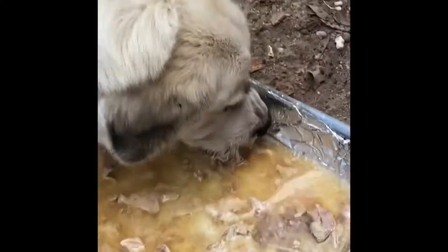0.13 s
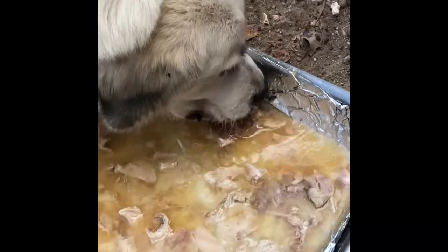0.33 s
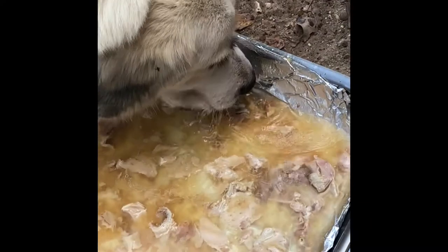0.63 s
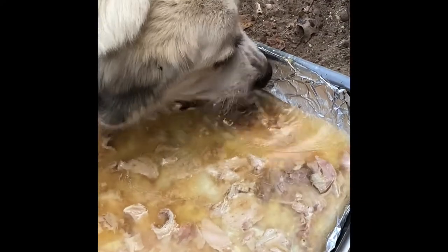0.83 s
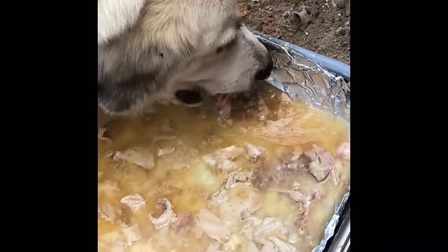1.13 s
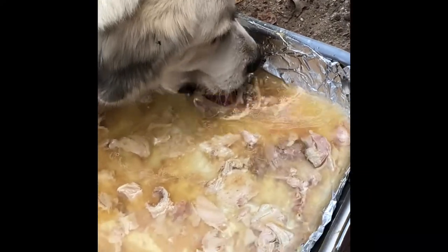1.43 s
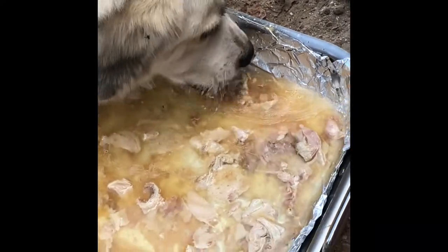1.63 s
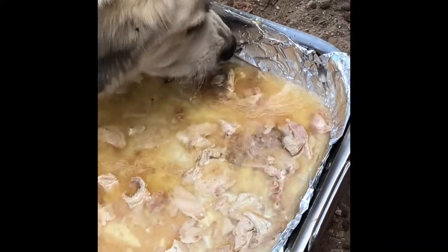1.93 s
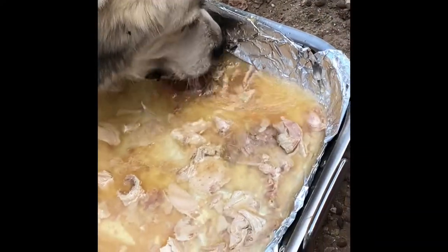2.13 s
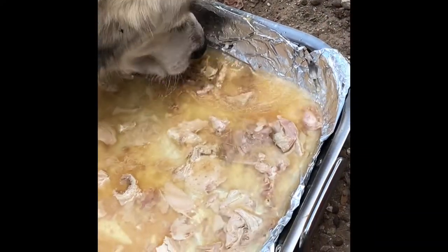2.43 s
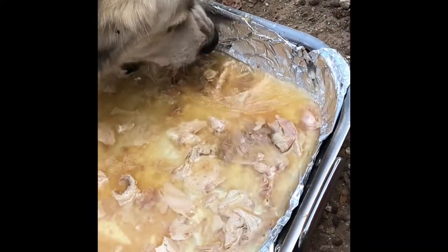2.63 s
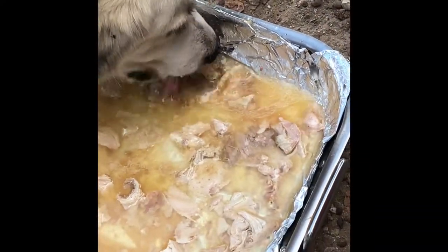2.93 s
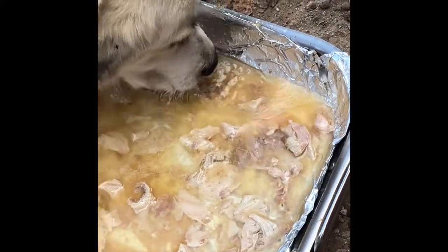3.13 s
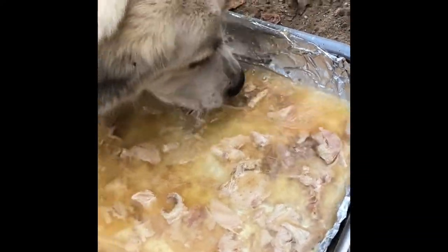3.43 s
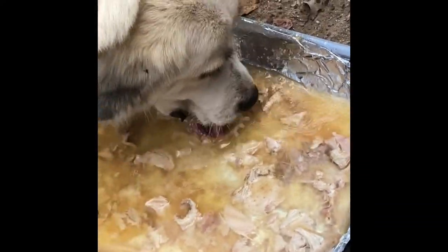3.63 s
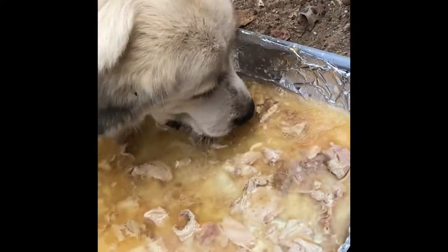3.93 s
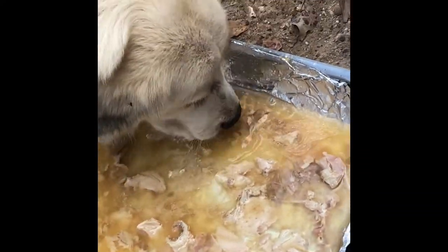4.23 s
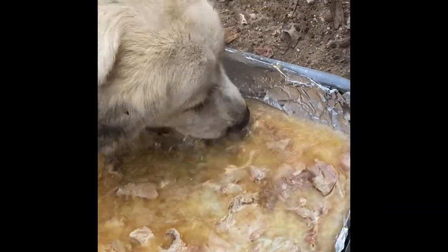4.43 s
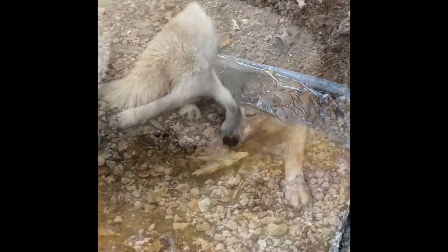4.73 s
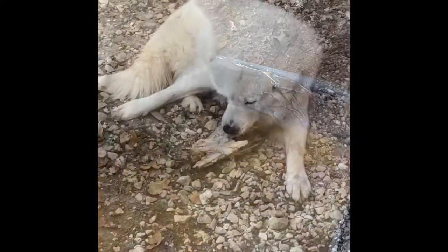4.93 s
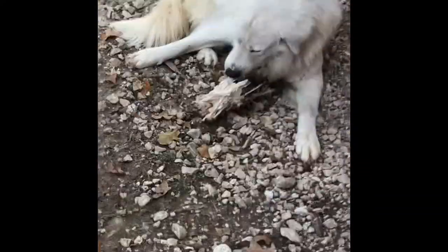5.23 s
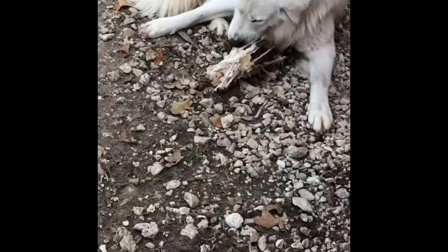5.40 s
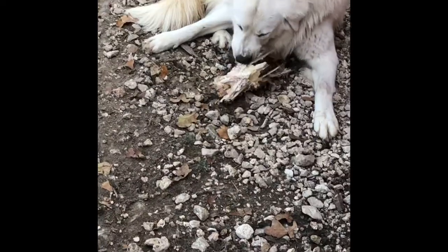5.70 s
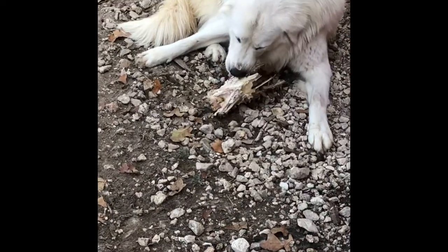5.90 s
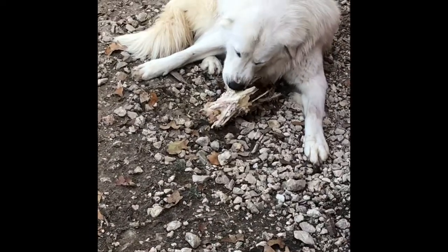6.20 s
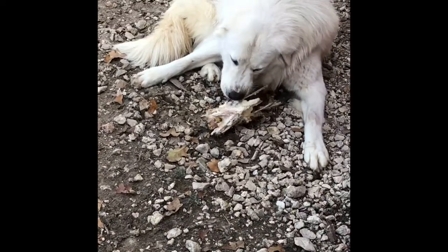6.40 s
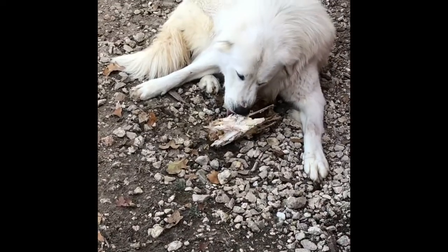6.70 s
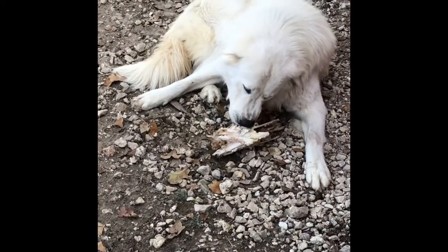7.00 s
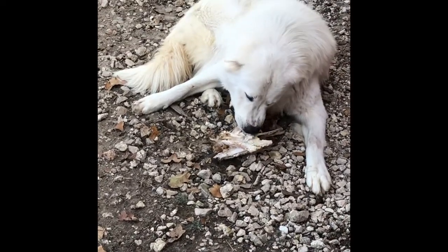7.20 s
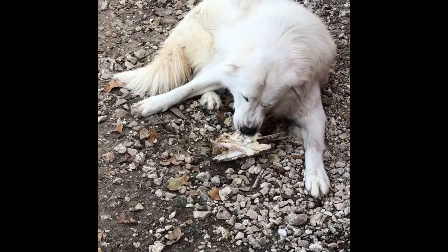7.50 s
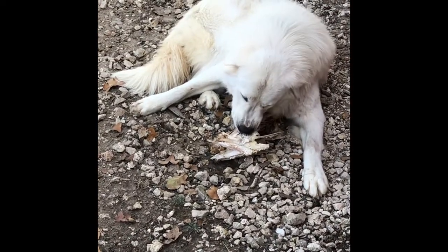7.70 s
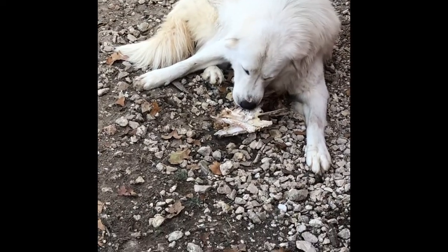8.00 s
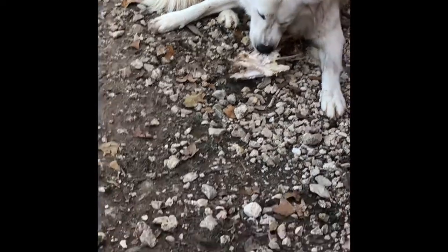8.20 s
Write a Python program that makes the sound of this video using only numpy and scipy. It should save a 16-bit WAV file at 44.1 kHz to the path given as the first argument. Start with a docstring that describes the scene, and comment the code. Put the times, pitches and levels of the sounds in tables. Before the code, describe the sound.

Very close outdoor pickup of a large dog lapping broth from a metal tray, nearly three strokes a second. Each stroke plops, sloshes and smacks, with pinging droplets and dull gulps. A collar tag tinkles now and then. After the middle the lapping grows softer, soft grunts and nose snuffles join in, and a fowl rasps three times quickly. Faint traffic rumbles far away.

```python
"""A dog laps broth outdoors, nearly three strokes a second: air pockets plop as chirping bubbles over crackling slaps,
droplets ping as tiny bubbles, the wet tongue smacks in bursts of crackle, the broth sloshes as countless bubbles,
gulps thump and air slurps upward in pitch. A collar tag tinkles as struck modes, the dog snuffles (shaped noise)
and grunts (overtones and breath) with the later strokes. A fowl rasps three times (pulses through resonances);
far traffic hums as shaped noise, an engine drone and a wavering tone."""
import sys
import numpy as np
from scipy import signal
from scipy.fft import rfft, irfft
from scipy.io import wavfile

SR = 44100
rng = np.random.default_rng(int(sys.argv[2]) if len(sys.argv) > 2 else 0)


def transcribe(signal):
    """Save signal, clipped to [-1, 1], as a 16-bit WAV file at the path in sys.argv[1]."""
    frames = np.atleast_2d(signal).T
    limited = np.clip(frames, -1, 1)
    pcm = np.round(limited * 32767).astype(np.int16)
    wavfile.write(sys.argv[1], SR, pcm)


N = 368235


def from_db(db):
    """Decibels to gain."""
    return 10 ** (np.asarray(db) / 20)


def rms_one(x):
    """Scales a signal to rms 1."""
    return x / np.sqrt(np.mean(x ** 2) + 1e-20)


def noise():
    """White noise over the whole scene."""
    return rng.standard_normal(N)


def in_time(rows):
    """Columns joined by straight lines over every sample."""
    s, *columns = np.transpose(rows)
    return [np.interp(np.arange(N) / SR, s, column) for column in columns]


def drift(rate_hz):
    """Slow chance: noise twice through a one-pole low-pass, rms 1, made at SR / 40."""
    r = np.exp(-2 * np.pi * rate_hz * 40 / SR)
    white = rng.standard_normal(N // 40 + 2002)
    slow = signal.lfilter([1], [1, -2 * r, r * r], white)[2000:]  # settled part
    return np.interp(np.arange(N) / 40, np.arange(len(slow)), rms_one(slow))


def coloured(x, spectrum):
    """Shapes a signal by a (frequency [Hz], level [dB]) spectrum, interpolated over log frequency."""
    hz = np.maximum(np.arange(len(x) // 2 + 1) * SR / len(x), 1)
    point_hz, point_db = np.array(spectrum).T
    gain = from_db(np.interp(np.log(hz), np.log(point_hz), point_db))
    return irfft(rfft(x) * gain, len(x))


def ring(clicks, hz, t60_s):
    """Two-pole resonator: a unit click starts a decaying sine of height 1."""
    r = from_db(-60 / (t60_s * SR))
    w = 2 * np.pi * hz / SR
    return signal.lfilter([0, np.sin(w)], [1, -2 * r * np.cos(w), r * r], clicks + 1e-18)


def resonate(x, modes):
    """Parallel (frequency [Hz], width [Hz], level [dB]) resonances with alternating signs; rms 1."""
    total = 0
    for k, (hz, width_hz, db) in enumerate(modes):
        total = total + (-1) ** k * from_db(db) * width_hz * ring(x, hz, 2.2 / width_hz)
    return rms_one(total)


def add(out, s, sound):
    """Mixes a short sound in at time s."""
    i = round(s * SR)
    out[i:i + len(sound)] += sound[:N - i]


def calls(rows, fade_s):
    """Pitch and gain of (start s, length s, first Hz, last Hz, dB) calls: each glides, fades in, holds, fades out."""
    points = []
    for s, length_s, first_hz, last_hz, db in rows:
        end_s, gain = s + length_s, from_db(db)
        points += [(s, first_hz, 0), (s + fade_s, first_hz, gain),
                   (end_s - fade_s, last_hz, gain), (end_s, last_hz, 0)]
    return in_time(points)


def bubble(hz, t60_s, rise, onset_cycles, sign):
    """A pocket of air rings up fast, slides up in pitch and dies."""
    t = np.arange(SR // 10) / SR
    t60_s = np.clip(t60_s, .004, .14)
    shape = (1 - np.exp(-t * hz / onset_cycles)) * from_db(-60 * t / t60_s)
    return sign * shape / shape.max() * np.sin(2 * np.pi * hz * t * (1 + rise * t / t60_s))


def cluster(out, s, db, hz, t60_s, chance, spread_s, detune_db, lesser_db):
    """A main bubble, followed by neighbours of nearby pitch, mostly smaller."""
    add(out, s, from_db(db) * bubble(hz, t60_s, .03, .7, np.sign(chance[0, 0])))
    for a, b, c in chance[1:]:
        near_hz = hz * from_db(detune_db * b)
        small = bubble(near_hz, t60_s / 2, .02 + .04 * abs(a), .7, np.sign(c))
        add(out, s + spread_s * abs(.8 + a), from_db(db + lesser_db + 2.5 * c) * small)


def ragged(events, spectrum):
    """One short uneven crackle per event, each with its own shade of the colour; rms 1."""
    size = (len(events), 2048)
    spikes_db = 7 * np.clip(rng.standard_normal(size), -3, 1.8)
    crackles = rng.standard_normal(size) * from_db(spikes_db)
    shades_db = rng.normal(0, 8.4, (len(events), len(spectrum)))
    shaded = []
    for crackle, shade_db in zip(crackles, shades_db):
        colour = [(hz, db + d) for (hz, db), d in zip(spectrum, shade_db)]
        shaded.append(rms_one(coloured(crackle, colour)))
    return shaded


SPATTER_TAIL_S = 0.014   # time constant


def swell(peak_s):
    """Builds up to 1 at peak_s, then falls away along a bell with a weaker exponential tail."""
    t = np.arange(2048) / SR
    peak_s = np.clip(peak_s, .001, .012)
    u = t / peak_s
    bell = np.exp(-(1.14 * (u - 1)) ** 2)
    tail = np.exp((peak_s - t) / SPATTER_TAIL_S)
    return np.where(u < 1, u ** 1.34, 0.83 * bell + 0.17 * tail)


# far traffic and air: (time [s], level [dB])
FAR_LEVEL = [(0, -58), (3.4, -58.5), (5.7, -59.5), (7.0, -59.5), (8.35, -58.5)]
# its colour: (frequency [Hz], level [dB per Hz])
FAR_COLOUR = [(21, -42), (35, -1), (75, 10), (316, 3), (948, 1.5), (1260, -4.5), (2380, -15), (3410, -17.5),
              (5260, -16), (6130, -17), (7530, -20.5), (14600, -22.5), (15800, -27)]
# steadier hum that comes and goes: (time [s], level [dB])
MOTOR_LEVEL = [(4.6, -90), (4.9, -71), (5.7, -75), (6.7, -61), (7.3, -72), (7.6, -90)]
MOTOR_HZ = 99.7
# far engine drone: (time [s], level [dB])
ENGINE_LEVEL = [(0, -77), (1.4, -64.5), (2.2, -76), (4.3, -71), (4.8, -87), (5.8, -61.5), (6.9, -67.5),
                (7.5, -87), (8.35, -94)]
# its resonance: (frequency [Hz], width [Hz], level [dB])
DRONE = [(64.8, 5.5, 0)]


def far_hum():
    """Slowly swelling coloured noise, a sine of drifting pitch and a narrow noise band as engine drone."""
    air_db = in_time(FAR_LEVEL)[0] + 0.5 * drift(0.16) + 1.53 * drift(5.0)
    air = from_db(air_db) * rms_one(coloured(noise(), FAR_COLOUR))
    motor_db = in_time(MOTOR_LEVEL)[0] + 2 * drift(3.6)
    motor_phase = 2 * np.pi * np.cumsum(MOTOR_HZ + drift(2.1)) / SR
    motor = from_db(motor_db) * np.sin(motor_phase)
    engine = from_db(in_time(ENGINE_LEVEL)[0]) * resonate(noise(), DRONE)
    return air + motor + engine


# fowl rasps: (start [s], length [s], first pitch [Hz], level [dB])
RASPS = [(5.135, 0.065, 376, -48), (5.234, 0.075, 371, -49), (5.333, 0.078, 372, -52)]
# throat and bill resonances: (frequency [Hz], width [Hz], level [dB])
BILL = [(1120, 200, -0.5), (1820, 52, 3), (2650, 160, 3.5), (3340, 320, 1.5), (5340, 3000, -13)]
RASP_END_HZ, RASP_FADE_S = 358, .022   # pitch each rasp sags to; fade in and out
YARD_T60_S, YARD_DB = .2, -8


def fowl():
    """Slightly uneven pulses with breath noise, through resonances of throat and bill, smeared by the yard."""
    rows = [(s, length_s, first_hz, RASP_END_HZ, db) for s, length_s, first_hz, db in RASPS]
    hz, gain = calls(rows, RASP_FADE_S)
    turns = np.cumsum(hz * (1 + .008 * drift(60))) / SR
    pulses = rms_one(np.diff(np.floor(turns), prepend=0))  # one per turn
    source = pulses + .45 * noise()
    call = gain * from_db(1.5 * drift(40)) * resonate(source, BILL)
    t = np.arange(SR // 3) / SR
    yard = rng.standard_normal(len(t)) * from_db(-60 * t / YARD_T60_S)
    echo = signal.fftconvolve(call, yard / np.linalg.norm(yard))[:N]
    return call + from_db(YARD_DB) * echo


# soft snuffles through the nose: (start [s], length [s], level [dB])
SNUFFLES = [(3.93, 0.051, -64), (5.85, 0.21, -68), (6.71, 0.18, -63.5), (6.969, 0.12, -67),
            (7.361, 0.08, -61.5), (7.517, 0.2, -67.5)]
# their colour: (frequency [Hz], level [dB per Hz])
NOSE = [(700, -3), (1300, -1), (2500, 2), (4000, -5), (9000, -14)]


def snuffles():
    """Soft, fluttering swells of air noise, coloured by the nose."""
    rows = [(s, length_s, 1, 1, db) for s, length_s, db in SNUFFLES]  # pitch unused
    _, gain = calls(rows, fade_s=.03)
    return gain * from_db(5.9 * drift(65)) * rms_one(coloured(noise(), NOSE))


# grunts: (start [s], length [s], last pitch [Hz], level [dB])
GRUNTS = [(5.34, 0.15, 185.7, -54), (5.671, 0.12, 168.6, -55), (6.059, 0.075, 165.3, -53.5),
          (6.479, 0.1, 179.7, -58), (6.814, 0.17, 181.4, -55.5), (7.206, 0.129, 171.3, -56.5),
          (7.582, 0.17, 188.8, -57.5), (7.939, 0.18, 184.3, -53.5)]
GRUNT_START_HZ, GRUNT_FADE_S = 179.4, 0.02


def grunts():
    """A wavering, rough hum from the closed throat, with overtones and rumbling breath, fading in and out."""
    rows = [(s, length_s, GRUNT_START_HZ, last_hz, db) for s, length_s, last_hz, db in GRUNTS]
    hz, gain = calls(rows, GRUNT_FADE_S)
    phase = 2 * np.pi * np.cumsum(hz * (1 + .06 * drift(35))) / SR
    hum = np.sin(phase) + .4 * np.sin(2 * phase) + .3 * np.sin(3 * phase) + .2 * np.sin(4 * phase)
    breath = resonate(noise(), [(212, 87, -2), (371, 65, 4.0), (630, 50, 2.5)])
    return gain * from_db(3 * drift(30)) * (hum + .6 * breath)


# collar tag strikes: (time [s], t60 [s], then level [dB] of each of four mode groups, lowest first)
TINKLES = [(0.2956, 0.041, -66, -41, -45, -59), (0.316, .05, -51, -70, -55, -58),
           (1.001, 0.18, -51, -47, -68, -61), (5.6175, 0.17, -62, -47.5, -54, -68),
           (5.67, 0.1, -35, -41, -42, -46), (5.8614, 0.22, -60, -70, -70, -62),
           (7.6104, 0.12, -72, -46, -52, -68)]
# mode groups, lowest first, each a list of: (frequency [Hz], level [dB])
TAG_MODES = [
    [(10840, -1), (10980, -5)],
    [(11200, -2)],
    [(12810, 0)],
    [(13440, -9), (13620, 0)],
]
TAG_ONSET_S = .001   # each strike's ring fades in over this time


def tag():
    """Each strike excites the mode groups with its own strengths; fur damps some strikes sooner."""
    out, click = np.zeros(N), np.eye(1, SR // 4)[0]
    onset = 1 - np.exp(-np.arange(SR // 4) / SR / TAG_ONSET_S)
    for s, t60_s, *levels_db in TINKLES:
        strike = np.zeros(len(click))
        for level_db, group in zip(levels_db, TAG_MODES):
            for hz, db in group:
                strike += from_db(level_db + db) * ring(click, hz, t60_s)
        add(out, s, onset * strike)
    return out


def froth(per_s, range_hz, cycles, size_db, clump_db, tilt_db, count):
    """Countless small bubbles burst in clumps, at pitches spread over a range; rms 1."""
    sizes = from_db(size_db * np.minimum(rng.exponential(1, N), 3)) * rng.choice([-1, 1], N)
    born = rng.random(N) < per_s * from_db(clump_db * drift(30)) / SR
    dealt = rng.integers(0, count, N)  # pitch index of each bubble
    rings = np.zeros(N)
    for k, hz in enumerate(np.geomspace(*range_hz, count)):
        rings += from_db(tilt_db * k / count) * ring(sizes * born * (dealt == k), hz, cycles / hz)
    high_pass = signal.butter(2, 0.5 * range_hz[0], "high", fs=SR, output="sos")
    return rms_one(signal.sosfilt(high_pass, rings))


# tongue strokes: (full stir start [s], full stir length [s], slosh level [dB], spray level [dB])
LAPS = [(0.07, 0.095, -40.5, -50.5), (0.42, 0.082, -41.5, -49.5), (0.82, 0.068, -44, -49.5),
        (1.13, 0.063, -43.5, -47.5), (1.53, 0.11, -49.5, -49.5), (1.88, 0.093, -43.5, -49.5),
        (2.206, 0.11, -45.5, -46.5), (2.60, 0.13, -45.5, -51), (2.95, 0.15, -49, -51),
        (3.30, 0.13, -45.5, -53), (3.70, 0.039, -43, -49.5), (4.02, 0.11, -47.5, -49),
        (4.45, 0.062, -49, -52), (4.75, 0.083, -50, -52.5), (5.10, 0.08, -51.5, -54.5),
        (5.40, 0.11, -54, -55.5), (5.722, 0.16, -51.5, -54), (6.13, 0.11, -49.5, -56.5),
        (6.57, 0.068, -54.5, -52), (6.90, 0.11, -55, -57), (7.22, 0.073, -58, -56.5),
        (7.67, 0.057, -51, -51), (8.00, 0.15, -60, -56.5)]


def stir(column, rise_db_per_s, fall_db_per_s):
    """Gain of the broth: every stroke rises, holds and falls; strokes add in power."""
    t, power = np.arange(0, N + 64, 64) / SR, 0
    for row in LAPS:
        start_s, length_s = row[:2]
        early_s = np.maximum(start_s - t, 0)
        late_s = np.maximum(t - start_s - length_s, 0)
        power = power + from_db(row[column] - rise_db_per_s * early_s - fall_db_per_s * late_s) ** 2
    return np.interp(np.arange(N) / SR, t, np.sqrt(power))


# hollows of mouth and tray: (frequency [Hz], gain [dB])
MOUTH = [(500, -3.5), (720, -7.5), (1000, -2.5), (1300, -5.5), (1700, -0.5), (2300, -6.5), (3250, 0),
         (4200, -2.5), (9000, -3)]
SLOSH_HZ, SPRAY_HZ = (560, 2100), (2300, 15000)   # bubble pitch ranges
SLOSH_RISE_DB_PER_S, SLOSH_FALL_DB_PER_S = 71, 190   # stirred up slowly, settles fast
SPRAY_RISE_DB_PER_S, SPRAY_FALL_DB_PER_S = 104, 172
FIZZ_MEDIAN_DB, FIZZ_CLUMP_DB = -17.4, 8.5   # against the bubble spray; spread of its level


def broth():
    """Low slosh and high spray bubbles with clumpy noise fizz, stirred by each stroke, coloured by the hollows."""
    slosh = froth(550, SLOSH_HZ, cycles=41.4, size_db=6.5, clump_db=8.0, tilt_db=-1.0, count=14)
    spray = froth(3600, SPRAY_HZ, cycles=44, size_db=8.0, clump_db=9.0, tilt_db=-1.5, count=24)
    fizz_gain = from_db(FIZZ_MEDIAN_DB + FIZZ_CLUMP_DB * drift(70))
    spray = spray + fizz_gain * rms_one(coloured(noise(), SMACK_COLOUR))
    stirred_slosh = slosh * stir(2, SLOSH_RISE_DB_PER_S, SLOSH_FALL_DB_PER_S)
    stirred_spray = spray * stir(3, SPRAY_RISE_DB_PER_S, SPRAY_FALL_DB_PER_S)
    return coloured(stirred_slosh + stirred_spray, MOUTH)


# mouthfuls swallowed: (time [s], peak level [dB], pitch [Hz])
GULPS = [(0.153, -34, 334), (0.487, -42.5, 353), (0.735, -42, 424), (0.839, -38.5, 318), (1.143, -46, 346),
         (1.315, -40, 306), (1.91, -38, 362), (2.684, -37, 397), (3.037, -32.5, 492), (3.184, -41, 330),
         (3.438, -43, 160), (3.455, -41, 328), (3.466, -43, 90), (3.61, -43.5, 324), (4.478, -41, 346),
         (5.847, -40, 400), (6.593, -33.5, 430)]


def gulps():
    """A dull, short cavity thump: a fast-starting bubble of rising pitch."""
    out = np.zeros(N)
    for s, db, hz in GULPS:
        add(out, s, from_db(db) * bubble(hz, 0.049, 0.14, 0.1, 1.0))
    return out


# air squeezed along the tongue: (time [s], peak level [dB], first pitch [Hz], length [s])
SLURPS = [(2.188, -38, 1330, 0.022), (3.956, -47, 1250, 0.039), (4.02, -43.5, 1290, 0.041)]
SLURP_RISE = 2.3   # pitch gained by the end, as a multiple of the first


def slurps():
    """A shrinking pocket of air starts at once and sweeps up ever faster, stuttering as it fades."""
    out = np.zeros(N)
    for s, db, first_hz, length_s in SLURPS:
        u = np.arange(0, 1, 1 / (length_s * SR))
        phase = 2 * np.pi * np.cumsum(first_hz * (1 + SLURP_RISE * u ** 2)) / SR
        add(out, s, from_db(db) * (1 - u ** 2) * np.sin(phase))
    return out * from_db(5 * drift(90))


# droplets falling back: (time [s], main bubble peak level [dB], pitch [Hz])
DROPS = [(0.093, -31, 4820), (0.152, -30.5, 2370), (0.206, -30.5, 5300), (0.4256, -28.5, 4570),
         (0.5023, -32, 2600), (0.6543, -32.5, 2930), (0.723, -34, 2760), (0.811, -33, 4100),
         (0.89, -27.5, 3660), (0.987, -37, 4730), (1.3161, -21, 3290), (1.4953, -35.5, 3100),
         (1.732, -32, 2940), (1.7855, -41.5, 2860), (2.251, -45, 2820), (2.4496, -38.5, 4080),
         (2.5395, -21, 5700), (2.58, -37, 3930), (2.922, -32.5, 3500), (3.038, -31, 3460),
         (3.195, -29, 4900), (3.2874, -22.5, 3460), (3.305, -33, 3420), (3.321, -28.5, 3330),
         (3.642, -40, 2820), (3.716, -38.5, 3100), (4.079, -29, 4340), (4.093, -27.5, 3170),
         (4.359, -37, 2990), (4.405, -37, 3440), (4.4531, -24.5, 3290), (4.746, -37, 3060),
         (4.786, -28, 3480), (5.848, -35, 3110), (6.0704, -44, 3500), (6.156, -28.5, 4500),
         (6.2058, -38, 3120), (6.482, -37.5, 3220), (6.642, -33.5, 2970), (6.936, -28, 5570),
         (7.0, -38.5, 3040), (7.287, -31.5, 6130), (7.682, -37, 3150), (7.7204, -30.5, 5300),
         (7.763, -33, 4340), (7.9707, -38, 3440), (8.0573, -38.5, 3580), (8.116, -33, 3690),
         (8.307, -35, 5800)]


def drops():
    """Small droplets ring for a few dozen cycles and scatter."""
    out, chance = np.zeros(N), rng.standard_normal((len(DROPS), 4, 3))
    for (s, db, hz), row in zip(DROPS, chance):
        cluster(out, s, db, hz, 48 / hz, row, spread_s=.004, detune_db=1.2, lesser_db=-10)
    return out


# wet tongue and lips parting: (time [s], nominal peak level [dB], time to peak [s])
SMACKS = [(0.001, -30, .003), (0.044, -35.5, 0.0032), (0.065, -38, 0.0049), (.171, -40, 0.0016),
          (0.093, -26.5, 0.004), (0.102, -34, 0.0025), (0.163, -40, 0.0023), (0.201, -27, 0.0024),
          (0.256, -38, 0.0023), (0.3256, -30, 0.0024), (0.392, -34.5, 0.0015), (0.425, -26.5, 0.0014),
          (0.44, -27, 0.0038), (0.457, -31, 0.0023), (0.643, -34.5, 0.0014), (0.724, -33.5, 0.0028),
          (0.7437, -21, 0.0012), (0.812, -27.5, 0.0034), (0.835, -27, 0.0026), (0.89, -26, 0.0034),
          (0.988, -39, 0.0019), (1.131, -33, 0.0013), (1.141, -28, 0.0061), (1.17, -16, 0.0025),
          (1.158, -26.5, 0.0037), (1.309, -37, 0.0009), (1.315, -12, 0.0017), (1.49, -37.5, 0.0042),
          (1.533, -38.5, 0.0079), (1.651, -28, 0.0072), (1.804, -43.5, 0.003), (1.901, -26.5, 0.0034),
          (1.909, -26, 0.0046), (1.972, -40, 0.0044), (2.158, -43, .002), (2.188, -35, 0.00093),
          (2.264, -26.5, 0.0024), (2.363, -37, 0.0038), (2.448, -33.5, 0.0021), (2.523, -33, 0.0028),
          (2.5386, -18, 0.00095), (2.636, -30.5, .003), (2.643, -29.5, 0.0048), (2.685, -33, 0.0058),
          (2.745, -44, 0.0047), (2.8797, -36, 0.0034), (2.922, -32, 0.0015), (2.967, -35, 0.0028),
          (2.976, -27, 0.0043), (2.99, -35, .004), (3.038, -38, 0.0014), (3.103, -32, 0.0061),
          (3.188, -39.5, 0.0054), (3.249, -32.5, 0.0022), (3.303, -35, 0.0038), (3.32, -30, 0.0026),
          (3.3334, -18.5, 0.0018), (3.367, -37, 0.0021), (3.466, -39.5, 0.0028), (3.541, -31.5, 0.0048),
          (3.609, -30, 0.0045), (3.687, -33, 0.0016), (3.723, -29, 0.004), (3.735, -31, .002),
          (3.748, -30, 0.0023), (3.792, -37.5, 0.0057), (3.919, -35.5, 0.0074), (3.988, -36, 0.0017),
          (4.0173, -29, 0.00099), (4.071, -27, 0.005), (4.092, -26, 0.0016), (4.366, -29, 0.0039),
          (4.449, -30.5, 0.0029), (4.464, -23, 0.0023), (4.5111, -41, 0.0012), (4.7044, -32, 0.0028),
          (4.785, -23.5, 0.0013), (4.816, -30, 0.002), (5.08, -40, 0.0031), (5.4338, -28, 0.004),
          (5.447, -46, 0.0023), (5.745, -37, 0.002), (5.792, -27, 0.0033), (5.939, -35, 0.0018),
          (6.035, -44, 0.0021), (6.067, -39, 0.0027), (6.124, -41, 0.0015), (6.153, -37.5, 0.0041),
          (6.205, -48, 0.00079), (5.857, -45, .008), (6.4814, -30, 0.00057), (6.561, -42, 0.002),
          (6.578, -27, 0.001), (6.636, -41.5, 0.0079), (6.838, -33.5, 0.0018), (6.922, -36, 0.0093),
          (6.9328, -23.5, 0.0028), (7.091, -41, 0.0015), (7.22, -37.5, 0.0029), (7.249, -33, 0.0027),
          (7.2846, -27.5, 0.0035), (7.496, -45, 0.0018), (7.666, -41, 0.0018), (7.682, -43, 0.0071),
          (7.721, -25.5, 0.0008), (7.798, -34.5, 0.00088), (7.991, -31.5, 0.0014), (8.0553, -25.5, 0.0039),
          (8.279, -42, 0.0014), (8.306, -26.5, 0.0026)]
# colour of smacks and of the broth's fizz: (frequency [Hz], level [dB per Hz])
SMACK_COLOUR = [(200, -19), (900, 3), (2000, -4.5), (4000, 1.5), (7000, 2), (11000, -1), (15500, -8.5)]
CRACKLE_CREST_DB = 6.5   # nominal peak over rms


def smacks():
    """A liquid film tears: uneven crackle that swells and dies within milliseconds."""
    out = np.zeros(N)
    for (s, db, peak_s), tear in zip(SMACKS, ragged(SMACKS, SMACK_COLOUR)):
        add(out, s, from_db(db - CRACKLE_CREST_DB) * swell(peak_s) * tear)
    return out


# air pockets closing under the tongue: (time [s], main bubble peak level [dB], pitch [Hz], t60 [s])
PLOPS = [(0.078, -27.5, 1420, 0.01), (0.153, -25, 1300, 0.007), (0.325, -39.5, 1427, 0.11),
         (0.425, -32.5, 1560, 0.013), (0.445, -37, 694, 0.1), (0.499, -29.5, 1980, 0.016),
         (0.734, -36, 730, 0.024), (0.817, -29, 1646, 0.036), (0.885, -27.5, 1450, 0.017),
         (1.138, -38, 1950, 0.0083), (1.145, -25, 1880, 0.013), (1.16, -36, 1730, .02),
         (1.224, -31, 1670, .015), (1.234, -35.5, 1710, 0.032), (1.318, -34, 1800, 0.018),
         (1.445, -40.5, 980, 0.1), (1.457, -36, 1660, 0.029), (1.533, -35, 1736, 0.058),
         (1.565, -33, 696, 0.016), (1.608, -23, 1640, 0.03), (1.616, -36, 1600, 0.069),
         (1.66, -41, 880, 0.027), (1.895, -28.5, 1240, 0.016), (1.959, -24, 1820, 0.028),
         (2.146, -46, 1060, 0.048), (2.164, -36, 695, 0.037), (2.239, -31, 1820, 0.036),
         (2.249, -24.5, 1624, 0.032), (2.3, -27, 1340, 0.0077), (2.266, -30, 1730, 0.016),
         (2.541, -31, 694, 0.016), (2.62, -27.5, 1793, 0.04), (2.682, -29.5, 1500, 0.019),
         (2.691, -24, 1770, 0.046), (2.883, -34, 690, 0.054), (2.95, -38.5, 1670, 0.025),
         (2.983, -34, 740, 0.019), (3.035, -29, 1433, 0.051), (3.252, -35, 680, 0.022),
         (3.395, -29.5, 1560, 0.026), (3.413, -35, 1590, 0.013), (3.643, -39.5, 633, 0.056),
         (3.686, -43, 514, 0.13), (3.717, -33.5, 1590, 0.012), (3.747, -36, 700, 0.038),
         (3.789, -24.5, 1240, 0.0059), (3.796, -28.5, 1320, 0.0084), (3.989, -42, 696, 0.038),
         (4.078, -27, 980, 0.0096), (4.132, -28, 1644, 0.044), (4.37, -32, 648, 0.034),
         (4.454, -38, 1750, 0.032), (4.514, -31.5, 1620, 0.051), (4.523, -32.5, 1355, 0.042),
         (4.705, -36.5, 930, 0.023), (4.803, -47.5, 698, 0.1), (4.873, -38, 1710, 0.039),
         (5.095, -36.5, 988, 0.058), (5.25, -41.5, 1670, 0.032), (5.43, -31, 984, 0.037),
         (5.491, -32.5, 980, 0.0032), (5.789, -35, 930, 0.044), (5.849, -26.5, 870, 0.008),
         (6.145, -35, 890, 0.0053), (6.483, -38, 626, 0.011), (6.581, -32, 910, 0.029),
         (6.634, -34, 1000, 0.0035), (6.936, -34.5, 955, 0.032), (7.286, -39.5, 1450, 0.026),
         (7.354, -35, 1630, 0.0042), (7.614, -41, 800, 0.048), (7.714, -41, 410, 0.03),
         (7.766, -37.5, 1120, 0.0084), (7.798, -37, 1450, 0.014), (8.056, -31.5, 1053, 0.02),
         (8.308, -40, 748, 0.062)]
# broth slapped by the tongue: (frequency [Hz], level [dB per Hz])
SLAP_COLOUR = [(60, -15), (200, -0.5), (400, 0), (900, 4.5), (1800, 5.5), (3300, 0.5), (6000, -20)]
SLAP_UNDER_DB = 7.5   # slap rms before its swell, below the plop's peak


def plops():
    """Each pocket breaks into several bubbles, with the slap of broth under them."""
    out, chance = np.zeros(N), rng.standard_normal((len(PLOPS), 5, 3))
    for (s, db, hz, t60_s), row, slap in zip(PLOPS, chance, ragged(PLOPS, SLAP_COLOUR)):
        cluster(out, s, db, hz, t60_s, row, spread_s=0.0093, detune_db=1.55, lesser_db=-8.0)
        add(out, s, from_db(db - SLAP_UNDER_DB) * swell(0.0043) * slap)
    return out


# tray wall reflections: (delay [s], level [dB])
ECHOES = [(.0058, -17.5)]


def with_tray_echo(mouth):
    """Adds delayed, weaker copies reflected by the tray wall."""
    near = mouth.copy()
    for s, db in ECHOES:
        add(near, s, from_db(db) * mouth)
    return near


def scene():
    """The mouth sounds with their short echo, over the background."""
    background = far_hum() + fowl() + snuffles() + grunts() + tag()
    mouth = broth() + gulps() + slurps() + drops() + smacks() + plops()
    return (background + with_tray_echo(mouth))[None]


TOP_STOP_HZ = 16400   # 60 dB down from here up


def record(dry):
    """The small microphone loses the deepest bass; the top is cut."""
    thin = signal.sosfilt(signal.butter(3, 45, "high", fs=SR, output="sos"), dry)
    return signal.sosfilt(signal.cheby2(22, 60, TOP_STOP_HZ, fs=SR, output="sos"), thin)


dry = scene()
out = record(dry)
transcribe(out)
```